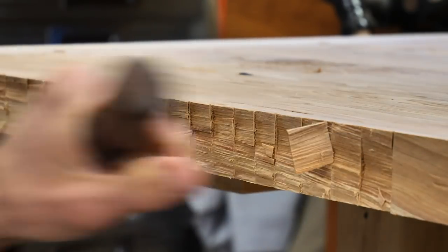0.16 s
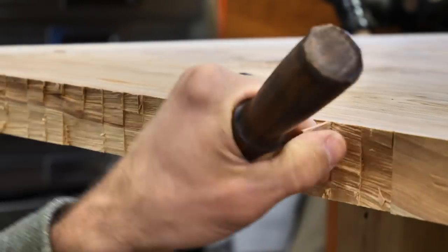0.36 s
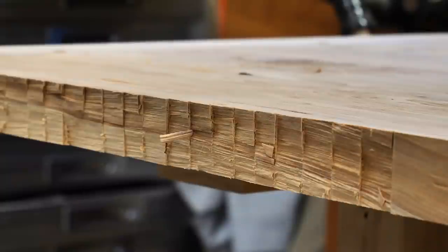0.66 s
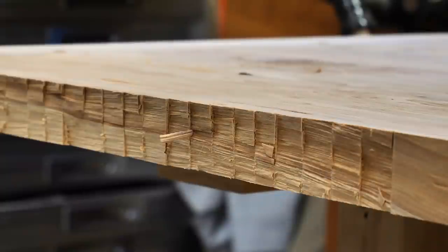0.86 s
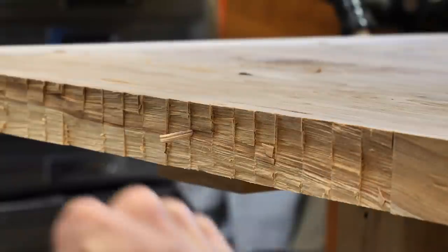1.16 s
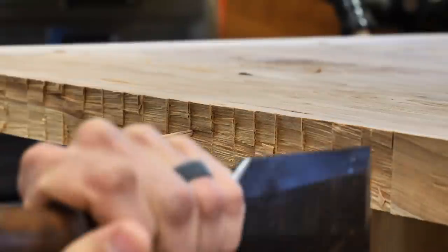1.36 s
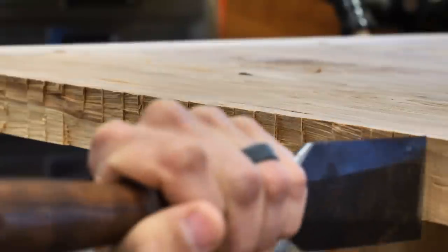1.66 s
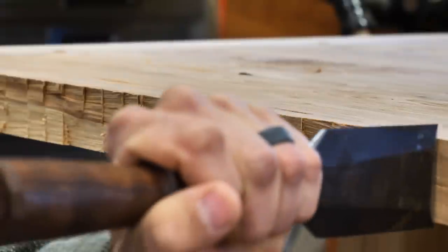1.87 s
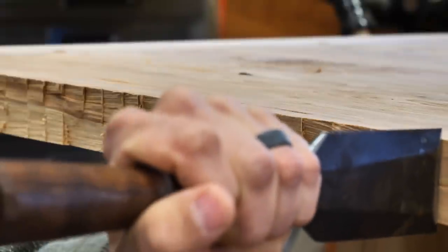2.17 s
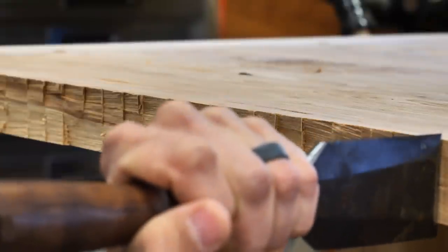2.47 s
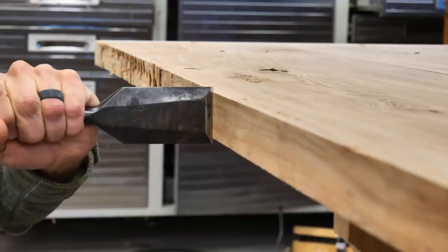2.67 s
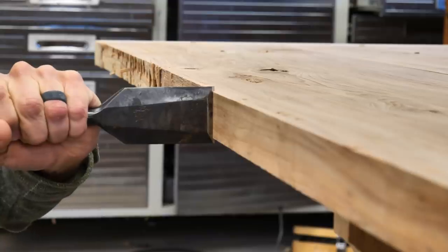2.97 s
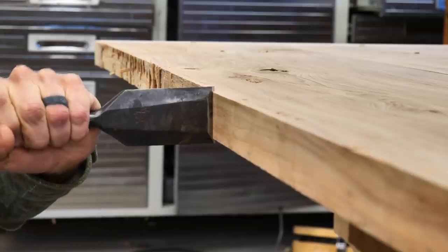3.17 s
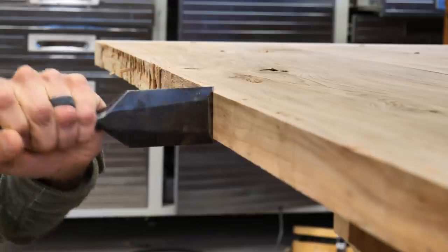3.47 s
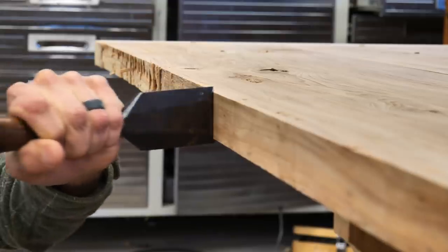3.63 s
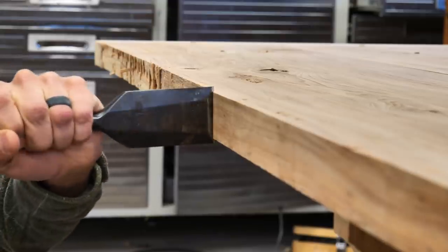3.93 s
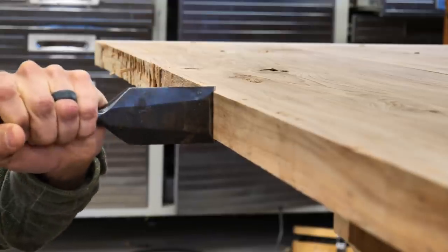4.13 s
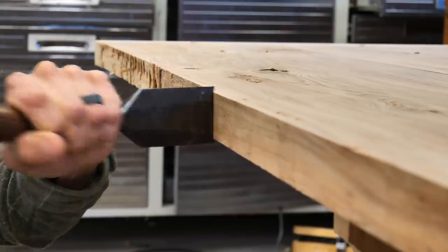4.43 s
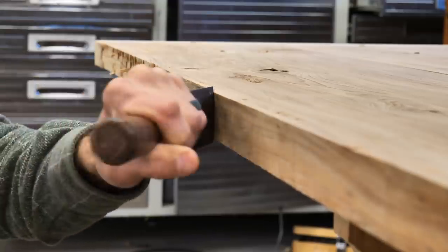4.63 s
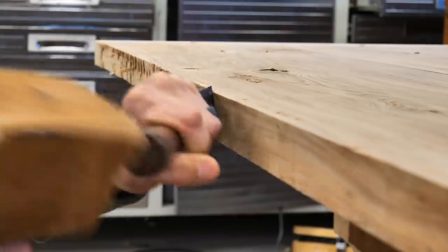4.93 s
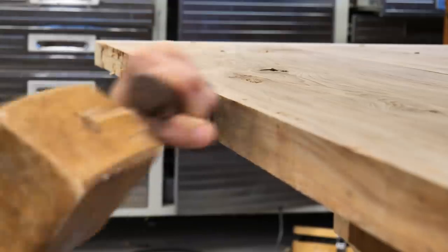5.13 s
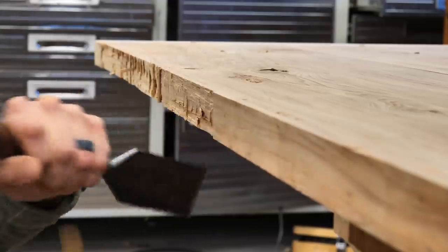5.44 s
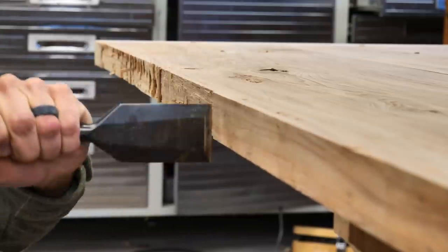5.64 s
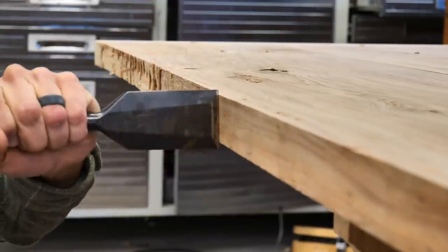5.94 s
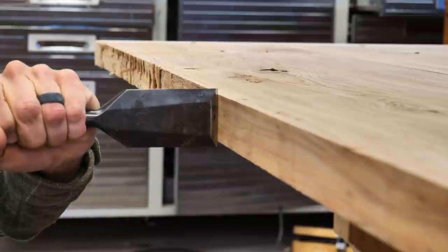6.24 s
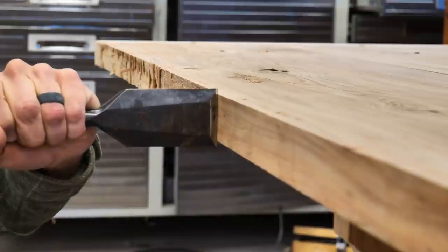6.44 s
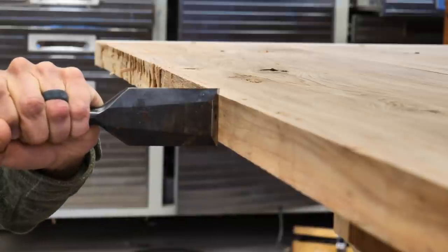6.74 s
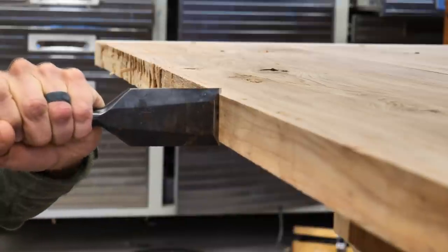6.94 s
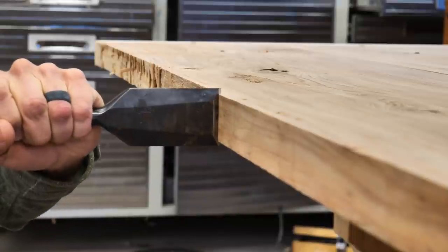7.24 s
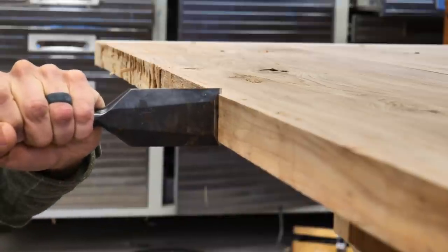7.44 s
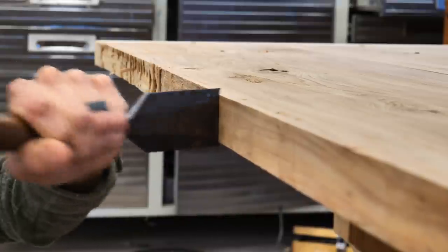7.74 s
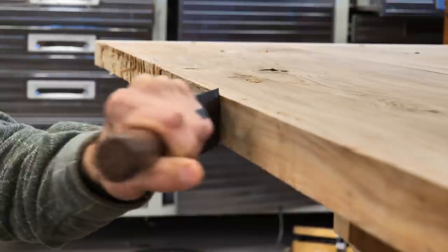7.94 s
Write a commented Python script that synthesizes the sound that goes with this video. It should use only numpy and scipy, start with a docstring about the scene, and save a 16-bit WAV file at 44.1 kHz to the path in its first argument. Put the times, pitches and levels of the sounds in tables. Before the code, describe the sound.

A wooden mallet drives a chisel into a wood slab in clusters of sharp knocks, with small splintering ticks in a workshop.

```python
"""Mallet and chisel on a thick slab

A wooden mallet drives a wide chisel into a slab's edge in a workshop. Each impact excites the modes of
slab and blade and splits the grain. Fibres tick as the blade levers, hands and shoes scuff, and a low
room rumble swells. A nearby phone lowers its gain on each blow and restores it as the room dies away."""
import sys
import numpy as np
from scipy import signal
from scipy.fft import rfft, irfft
from scipy.io import wavfile
from scipy.ndimage import uniform_filter1d

SR = 44100
rng = np.random.default_rng(int(sys.argv[2]) if len(sys.argv) > 2 else 0)


def store_pcm(level_fs):
    """Save levels as 16-bit WAV."""
    pcm = np.round(np.clip(level_fs, -1, 1) * 32767).astype(np.int16)
    wavfile.write(sys.argv[1], SR, np.atleast_2d(pcm).T)


N = 357210
T = np.arange(N) / SR
SIDE = np.array([[1], [-1]])  # opposite signs in the two channels


def undb(db):
    """Decibels to amplitude ratio."""
    return 10 ** (np.asarray(db) / 20)

def unit(x):
    """Normalisation to an RMS of 1."""
    return x / np.sqrt(np.mean(x ** 2))

def fade(t, t60):
    """Exponential decay, 60 dB in t60 seconds."""
    return np.exp(-np.log(1000) * t / t60)

def add(out, start_s, x):
    """Superposition of x from start_s on."""
    i = int(start_s * SR)
    out[i:i + len(x)] += x[:N - i]

def band(x, hz, width):
    """Two-pole resonance."""
    return signal.lfilter(*signal.iirpeak(min(hz, .45 * SR), hz / width, fs=SR), x)

def steep(x, hz, width):
    """Two resonances in cascade give steeper skirts."""
    return band(band(x, hz, width), hz, 2.6 * width)

def shape(x, points):
    """Spectral weighting by (Hz, dB) points on a log-frequency axis."""
    hz, db = np.transpose(points)
    f = np.fft.rfftfreq(x.shape[-1], 1 / SR) + 1
    return irfft(rfft(x) * undb(np.interp(np.log(f), np.log(hz), db)), x.shape[-1])

def wander(rate_hz):
    """Slow modulation: random steps, smoothed twice."""
    hold = int(SR / rate_hz)
    steps = np.repeat(rng.standard_normal(N // hold + 1), hold)
    return 1.7 * uniform_filter1d(uniform_filter1d(steps, hold), hold)[:N]

def burst(hz, width, t60):
    """Damped noise in one band, peak 1."""
    t = T[:SR // 4]
    y = steep(rng.laplace(size=len(t)) * fade(t, max(t60, .003)), hz, width)
    return y / np.abs(y).max()

def click(hz, width):
    """Impulse response of one band, energy 1."""
    y = steep(signal.unit_impulse(SR // 20), hz, width)
    return y / np.linalg.norm(y)


# Hiss spectrum: frequency_hz, relative_density_db
HISS_SPECTRUM = [(15, -32.5), (25, -11.5), (53, 1), (153, -3.5), (200, -7.5), (309, -12.5), (373, -13.5),
                 (677, -17), (796, -16.5), (1610, -20.5), (2110, -21.5), (2990, -25.5), (16000, -45)]
# Stereo width of the hiss: frequency_hz, side_re_mid_db
HISS_WIDTH = [(40, -21), (80, 4.5), (200, -14), (2000, -3.5), (12000, -3.5)]
# Low room rumble: time_s, level_db
ROOM_RUMBLE = [(0.0, -57), (0.4, -70), (0.75, -61.5), (1.33, -68), (1.44, -49), (1.72, -66.5),
               (1.92, -55.5), (2.3, -75), (2.66, -63), (2.759, -52.5), (3.03, -44.5), (3.17, -52.5),
               (3.45, -46), (3.902, -62), (4.309, -51.5), (4.699, -67), (5.2, -53), (6.048, -59),
               (6.25, -46.5), (6.6, -60.5), (6.85, -48.5), (7.0, -55), (7.2, -44), (7.5, -60.5),
               (8.1, -59.5)]

def room_rumble_and_hiss(hiss_db=-62):
    """Amplitude-modulated noise: hiss wavers; a low rumble swells in soft thumps and after the blows."""
    def hiss_noise():
        return shape(rng.standard_normal(N), HISS_SPECTRUM)
    hiss = unit(hiss_noise()) * undb(hiss_db + 1.1 * wander(2))
    swell_db = np.interp(T, *np.transpose(ROOM_RUMBLE)) + 2.2 * wander(9)
    rumble = unit(band(band(rng.standard_normal(N), 86, 36), 72, 140)) * undb(swell_db)
    side = shape(hiss_noise(), HISS_WIDTH) / np.std(hiss_noise())
    return hiss + rumble + undb(hiss_db) * side * SIDE


# Workshop reverberation: centre_hz, level_db, t60_s
ROOM_BANDS = [(178, -25.5, 0.62), (366, -42, 0.46), (980, -35, 0.45), (2390, -44.5, 0.8),
              (4830, -37.5, 0.6), (7840, -28, 0.093), (13000, -42.5, 0.17)]

def room(x, side_db=-44.5, onset_s=.0042):
    """Diffuse reverberation: each band decays at its own rate, nearly alike in both channels."""
    t = T[:SR]
    onset = np.minimum(t / onset_s, 1)
    tails = np.zeros((2, SR))
    for hz, db, t60 in ROOM_BANDS:
        tails += undb(db) * fade(t, t60) * onset * band(rng.standard_normal(tails.shape), hz, .89 * hz)
    mid, side = signal.fftconvolve(x[None], tails, axes=1)[:, :N]
    return mid + undb(side_db) * side * SIDE


# Bright and airy friction bands: centre_hz, width_hz
RUB_BANDS = [(4500, 2800), (9800, 4000)]
# Strokes of hands and shoes: peak_s, rise_s, fall_s, dull_hz, dull_db, bright_db, airy_db
STROKES = [(0.238, 0.014, 0.021, 1000, -61.5, -52, -48.5), (0.371, 0.1, 0.046, 1490, -69, -62.5, -74),
           (0.52, 0.026, 0.01, 895, -60, -63, -83), (0.654, .012, .007, 1510, -66.5, -63.5, -61.5),
           (0.883, 0.042, .014, 1120, -56.5, -44.5, -55), (1.242, 0.038, 0.035, 1720, -55.5, -60, -74),
           (1.439, 0.059, 0.021, 1920, -54, -65, -72), (1.88, 0.058, 0.037, 1020, -68, -79, -94),
           (2.307, 0.0029, 0.003, 1380, -61.5, -96, -94), (2.706, 0.0048, 0.044, 1315, -53.5, -65, -84),
           (3.758, 0.046, 0.021, 743, -58, -63, -71), (4.531, 0.042, 0.019, 897, -57, -65.5, -73),
           (4.621, 0.068, 0.046, 1248, -73.5, -77.5, -70), (5.611, 0.033, 0.063, 1147, -56, -66.5, -76.5),
           (5.87, 0.058, 0.04, 1254, -72, -63.5, -71), (6.23, 0.034, 0.08, 1080, -53.5, -66.5, -83),
           (7.841, 0.036, 0.017, 623, -57, -63.5, -68), (7.988, 0.05, 0.038, 960, -58.5, -60, -67.5)]

def scuffs(ring_db=-2, ring_q=6):
    """Stick-slip friction: the noise catches and slips, and the rubbed wood resonates."""
    out = np.zeros(N)
    grip = unit(undb(1.2 * wander(250) + 1.6 * wander(900)))
    rub = np.array([unit(grip * steep(rng.standard_normal(N), hz, width)) for hz, width in RUB_BANDS])
    for peak_s, rise, fall, hz, dull_db, *rub_db in STROKES:
        noise = rng.standard_normal(SR)
        dull = unit(steep(noise, hz, 1.3 * hz) + undb(ring_db) * steep(noise, hz, hz / ring_q))
        peak = int(peak_s * SR)
        span = slice(max(peak - SR // 3, 0), peak + SR // 2)
        t = T[span] - peak_s
        stroke = np.exp(-np.where(t < 0, (t / rise) ** 2, np.hypot(t / fall, 1) - 1))
        out[span] += stroke * (undb(dull_db) * grip[span] * dull[:len(t)] + undb(rub_db) @ rub[:, span])
    return out


# Resonances of the loosely held blade: pitch_hz, level_db
LOOSE_RINGS = [(8500, -50), (9500, -48)]
# Its contacts with the slab: start_s, level_db
BLADE_TOUCHES = [(1.214, 3.5), (1.347, -9)]

def blade_brushes():
    """Free vibration: the loose blade rings thinly after brushing the slab."""
    out = np.zeros(N)
    for start_s, db in BLADE_TOUCHES:
        for hz, ring_db in LOOSE_RINGS:
            add(out, start_s, undb(db + ring_db) * burst(hz, width=300, t60=.23))
    return out


# Breaking fibres: start_s, level_db, centre_hz, width_hz, t60_s
FIBRE_SNAPS = [(0.184, -40.5, 4470, 5000, 0.29), (0.228, -30, 9500, 7000, 0.069),
               (0.308, -44, 12000, 6000, .02), (0.464, -51, 9000, 4000, 0.014),
               (0.502, -30, 9200, 4930, 0.025), (0.507, -38.5, 3840, 2480, 0.02),
               (0.7529, -28.5, 6750, 4860, 0.0049), (0.76, -50, 7440, 3500, 0.044),
               (1.216, -28, 8700, 5000, 0.035), (1.346, -43.5, 8800, 2200, 0.042),
               (3.742, -44.5, 4750, 5080, 0.019), (4.634, -39.5, 9280, 4900, 0.022),
               (5.29, -40, 11500, 5000, 0.072), (5.784, -44, 4450, 6970, 0.02),
               (5.788, -36, 4450, 7000, 0.015), (5.842, -30.5, 3990, 8000, 0.055),
               (7.939, -37.5, 4860, 6000, 0.025), (7.949, -36, 5250, 4020, 0.017),
               (7.968, -41, 5300, 3100, 0.024)]

def fibre_ticks(snap_db=8, wall_db=12):
    """Brittle fracture: a sharp snap, then splinter noise. Returns direct and wall-bound sound."""
    near, far = np.zeros((2, N))
    for start_s, db, hz, width, t60 in FIBRE_SNAPS:
        snap = click(hz, width)
        add(near, start_s, undb(db + snap_db) * snap)
        add(near, start_s, undb(db) * burst(hz, width, t60))
        add(near, start_s, undb(db) * click(hz=1700, width=5500))  # woody body
        add(far, start_s, undb(db + wall_db) * snap)
    return near, far


# Modes of slab and mallet: pitch_hz, level_db, t60_s
SLAB_MODES = [(62, -10, 0.04), (154, -16.5, 0.17), (232.5, -8, 0.34), (307.6, -4.5, 0.28),
              (393.6, -4, 0.24), (550, -6, 0.12), (709, -1, 0.12), (773.3, -0.5, 0.15), (914, 2.5, 0.1),
              (1139, -3, 0.11), (1315, 1, 0.12), (1500, 7, 0.053), (1980, -4.5, 0.05), (2600, -1, 0.032)]

def slab_knock(contact_ms, scatter_db=3.5, detune=.015, pair_spread=.02):
    """Modal response: longer contact weakens the upper modes; each strike point weights them anew."""
    t = T[:SR // 3]
    hz, db, t60 = np.transpose(SLAB_MODES)[:, :, None]
    level, pitch, polarity, split = rng.standard_normal((4, len(SLAB_MODES), 1))
    amplitude = undb(db + scatter_db * level) * np.sign(polarity)
    modes = amplitude * np.sin(2 * np.pi * hz * (1 + detune * pitch) * t) * fade(t, t60)
    beats = np.cos(np.pi * hz * pair_spread * (1 + split / 2) * t)  # each mode is a close pair
    force = t[:400] * np.exp(-t[:400] * 4000 / max(contact_ms, .03))
    y = signal.fftconvolve((modes * beats).sum(axis=0), force)[:len(t)]
    return y / np.abs(y).max()


# Knocks of blade, hand and fallen chips: start_s, level_db, contact_ms, thud_hz, thud_re_knock_db
SOFT_KNOCKS = [(0.503, -48.5, 0.79, 586, -1.5), (2.37, -59.5, 5.9, 236, 12), (2.7, -41.5, 0.88, 250, -1.5),
               (5.893, -34, 3.1, 534, 4.5), (6.139, -39.5, 2.7, 319, 1)]

def soft_taps(attack_s=.004):
    """Soft impacts: slow contact excites mainly the low modes, with a dull thud."""
    out = np.zeros(N)
    for start_s, db, contact_ms, hz, thud_db in SOFT_KNOCKS:
        add(out, start_s, undb(db) * slab_knock(contact_ms))
        thud = steep(burst(hz, .34 * hz, t60=.13), hz, 3.4 * hz)
        onset = np.minimum(T[:len(thud)] / attack_s, 1)
        add(out, start_s, undb(db + thud_db) * thud * onset)
    return out


def air_swing(hz=850):
    """Acceleration noise: one swing of air as the mallet face stops."""
    phase = 2 * np.pi * hz * T[:int(SR / hz)]
    return np.sin(phase) * np.minimum(phase, 1)


def grain_crack(hz, crack_db):
    """Fracture noise in two bands; weak cracks crumble on for longer."""
    t60 = .016 * undb(-.16 * crack_db)
    crack = undb(crack_db) * burst(hz, width=1600, t60=t60)
    treble = undb(-10.5 + .54 * crack_db) * burst(hz=8800, width=2200, t60=t60)
    return crack + treble


# Resonances of the gripped chisel, low to high: width_hz, level_db
GRIPPED_RINGS = [(400, -4), (580, -3), (800, -11)]

def blade_rings(pulse, middle_hz, top_hz, lowest_db, upper_db, lowest_hz=1440, rasp_db=-11):
    """Damped resonance of the biting blade: a direct rasp, and a pulse response for the walls."""
    rasp = rings = 0
    voices = [(lowest_hz, lowest_db), (middle_hz, upper_db), (top_hz, upper_db)]
    for (hz, db), (width, ring_db) in zip(voices, GRIPPED_RINGS):
        rasp += undb(rasp_db + db + ring_db) * burst(hz, width, t60=.16)
        rings += undb(db + ring_db) * steep(pulse, hz, width)
    return rasp, rings


# Spectrum a blow sends to the walls: frequency_hz, base_db, db_per_bright_db, db_per_crack_db
WALL_SPECTRUM = [(150, 13, 0, -0.33), (510, 6.5, 0.25, 0.02), (1390, 16.5, 0.15, 0.17),
                 (2680, 12, 0.7, 0.43), (4860, 12.5, 0.57, 0.53), (9400, -2, 0.07, 0.94),
                 (15900, -14.5, 1.5, 0.3)]
# Blows and rebounds: start_s, level_db, contact_ms, thud_hz, middle_ring_hz, top_ring_hz, then
# relative levels: swing_db, thud_db, crack_db, lowest_ring_db, upper_rings_db, echo_bright_db
MALLET_BLOWS = [(2.8533, -7.5, 0.11, 1110, 3500, 4380, -2.5, 7.5, 10.5, -4.5, -1.5, 2.5),
                (3.213, -7, 0.067, 1320, 3500, 4590, -12.5, 7.5, 1, -8, -11, 8.5),
                (4.2193, -9, 0.24, 798, 3860, 4900, -2, 1, 7, -9.5, -5, -2.5),
                (4.967, -14.5, 0.073, 850, 2640, 4470, 7.5, -11, -8, 2, 8, 3.5),
                (5.2022, -20, 0.1, 876, 3010, 3820, 12, 3.5, 3.5, -24, -7.5, -4.5),
                (5.2217, -24, 0.98, 890, 2980, 4260, 5.5, -13.5, -8, -6, -10, -22),
                (6.6555, -9, 0.075, 920, 2780, 4530, -4.5, 4.5, -7, 7, -3.5, 3),
                (7.0295, -8, 0.089, 1127, 2890, 4400, -6, 3, 5, 3.5, 5.5, 3.3),
                (7.4086, -7.5, 0.02, 1390, 3180, 4130, -11.5, 7.5, 10, -14, -26, 4)]

def mallet_blows(drive_db=6, bite_lag_s=.0007, edge_hz=760, edge_width_hz=190):
    """Impact excitation of air, slab and blade at each blow. Returns direct and wall-bound sound."""
    near, far = np.zeros((2, N))
    pulse = signal.unit_impulse(SR // 20, idx=SR // 200)
    edge_ring = undb(.5) * steep(pulse, edge_hz, edge_width_hz)  # the slab's hollow edge
    taper = np.hanning(2 * SR)[SR:]
    faint_tone = undb(-50.5) * np.sin(2 * np.pi * 800 * T[:SR]) * fade(T[:SR], t60=2.1) * taper
    for (start_s, db, contact_ms, thud_hz, middle_hz, top_hz,
         swing_db, thud_db, crack_db, lowest_db, upper_db, bright_db) in MALLET_BLOWS:
        gain = undb(db + drive_db)
        slab = slab_knock(contact_ms)
        body = undb(-8.5) * burst(hz=320, width=710, t60=.32)
        edge = undb(-5) * burst(edge_hz, edge_width_hz, t60=.14)
        thud = undb(thud_db) * burst(thud_hz, 1.2 * thud_hz, t60=.032)
        crack = grain_crack(top_hz, crack_db)
        rasp, rings = blade_rings(pulse, middle_hz, top_hz, lowest_db, upper_db)
        for part in (undb(swing_db) * air_swing(), body, edge, faint_tone):
            add(near, start_s, gain * part)
        for part in (slab, thud, crack, rasp):  # the blade bites just after the mallet lands
            add(near, start_s + bite_lag_s, gain * part)
        colour = [(hz, base + per_bright * bright_db + per_crack * crack_db)
                  for hz, base, per_bright, per_crack in WALL_SPECTRUM]
        add(far, start_s, gain * shape(pulse + rings + edge_ring, colour))
        add(far, start_s, gain * undb(-19) * slab)
    return near, far


def scene(port_lag_s=3e-6):
    """Superposition of direct sound, reverberation and room noise at two microphone ports."""
    blows, blows_far = mallet_blows()
    taps = soft_taps()
    ticks, ticks_far = fibre_ticks()
    rubbing = scuffs()
    direct = blows + taps + ticks + rubbing + blade_brushes()
    handling_far = rubbing + ticks_far + undb(-5.5) * taps
    lead = port_lag_s * SR / 2 * np.gradient(direct) * SIDE  # one port hears the slab first
    return direct + lead + room(blows_far + undb(-2.5) * handling_far) + room_rumble_and_hiss()


def gain_control(x, knee_db, ratio, attack_s, release_db_per_s):
    """Compression: gain drops quickly above the knee, then climbs back steadily in dB."""
    pole = np.exp(-1 / (attack_s * SR))
    envelope = signal.lfilter([1 - pole], [1, -pole], np.abs(x).mean(axis=0))
    cut_db = np.maximum(20 * np.log10(envelope + 1e-9) - knee_db, 0) * (1 - 1 / ratio)
    ramp = release_db_per_s * T
    return x * undb(ramp - np.maximum.accumulate(cut_db + ramp))


# Gain control below and above the split: knee_db, ratio, attack_s, release_db_per_s
COMPRESSORS = [(-36.5, 1.84, 0.017, 66), (-49, 1.61, 0.00085, 64.5)]

def record(dry, split_hz=3300, ceiling=.42, low_hz=28.8, top_hz=16300):
    """Two-band compression, soft clipping and band limiting in the phone."""
    low = signal.lfilter(*signal.butter(1, split_hz, fs=SR), dry)
    y = gain_control(low, *COMPRESSORS[0]) + gain_control(dry - low, *COMPRESSORS[1])
    y = y / (1 + np.abs(y / ceiling) ** 4) ** (1 / 4)
    y = signal.lfilter(*signal.butter(1, low_hz, "high", fs=SR), y)
    return signal.sosfilt(signal.ellip(8, .2, 70, top_hz, fs=SR, output="sos"), y)


dry = scene()
out = record(dry)
store_pcm(out)
```